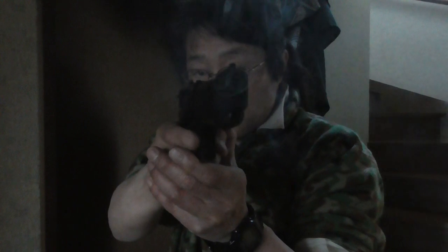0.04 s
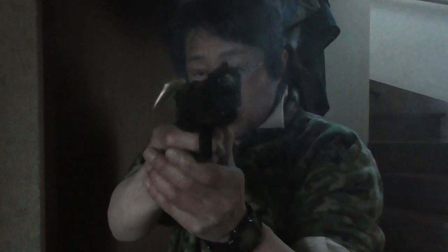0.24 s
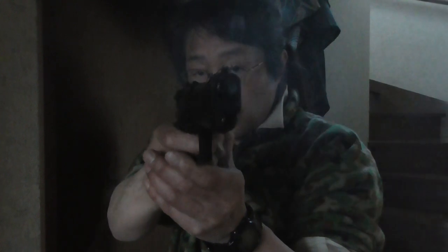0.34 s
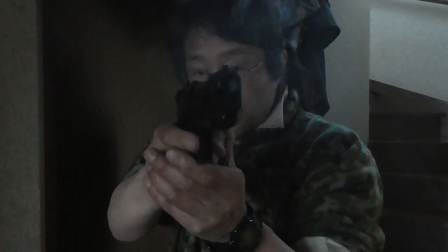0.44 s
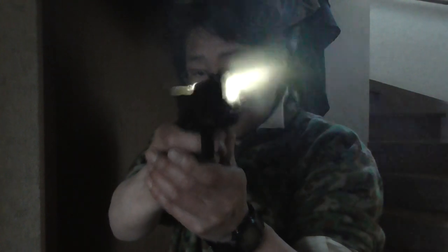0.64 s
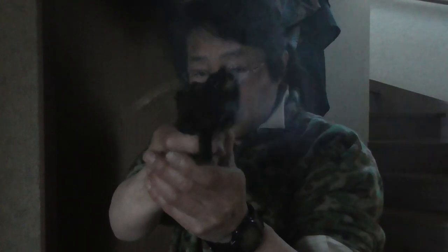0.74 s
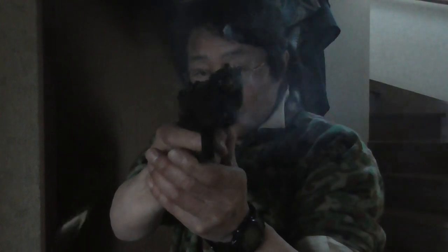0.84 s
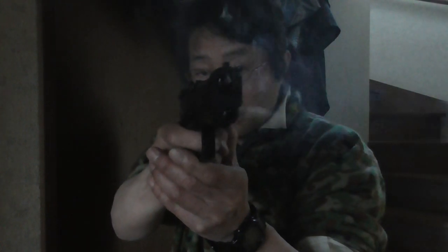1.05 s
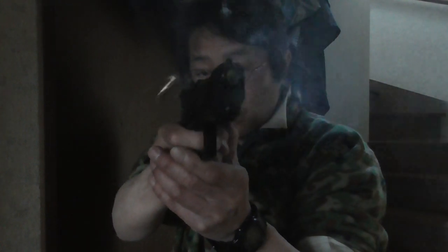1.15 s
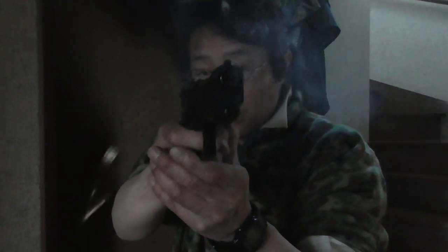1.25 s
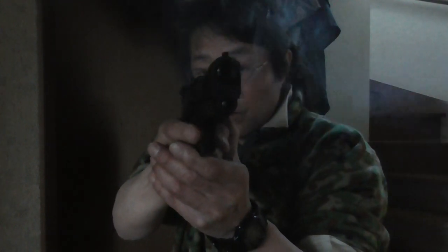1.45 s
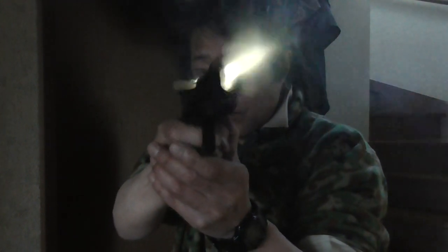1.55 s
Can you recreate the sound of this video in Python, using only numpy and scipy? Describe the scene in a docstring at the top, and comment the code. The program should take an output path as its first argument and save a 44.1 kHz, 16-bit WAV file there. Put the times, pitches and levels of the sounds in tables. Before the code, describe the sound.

A cap pistol cracks three times indoors, with spent casings knocking and clicking between shots.

```python
"""Cap pistol in a small room

A toy pistol fires towards the microphone. Each shot is a hammer snap, the crack of the cap,
a pressure pulse and a puff of gas; then the slide slams shut. Between shots, ejected casings
knock on the wooden floor, click and clink. The hard-walled room rings over a faint hiss and hum."""
import sys
import numpy as np
from scipy import signal
from scipy.fft import rfft, irfft, next_fast_len
from scipy.io import wavfile

SR = 44100
rng = np.random.default_rng(int(sys.argv[2]) if len(sys.argv) > 2 else 0)


def master_out(mix):
    """Clip the mix to full scale and print it as 16-bit PCM to the path in sys.argv[1]."""
    frames = np.transpose(np.atleast_2d(mix))
    ceiling = np.clip(frames, -1, 1)
    pcm = np.round(ceiling * 32767).astype(np.int16)
    wavfile.write(sys.argv[1], SR, pcm)


N = 70560
LEAD = SR // 4  # pre-roll for cues that start before zero
AGE = np.arange(SR) / SR  # seconds into a one-second sound

# Shots, the first heard only as a tail: start_s, level_db, pulse_db, puff_delay_s, puff_db
SHOTS = [(-.215, -0.5, -6, .008, -16), (0.2471, -1, -5, 0.0027, -11), (0.7301, -1.5, -13.5, .008, -13.5),
         (1.1565, -1, -10, 0.00833, -6)]
# Slapback off the nearest walls: delay_s, level_db
SLAPBACKS = [(.0065, -17), (0.0138, -13.5), (0.028, -20.5)]
# EQ for the dry crack, its reverb and the gas puff: freq_hz, gain_db
CRACK_EQ = [(100, -0.5), (700, 6.5), (1500, 1), (2700, -7), (4300, 4), (6000, 0.5), (8000, 6.5), (11000, 2),
            (15500, -7.5)]
SHOT_REVERB_EQ = [(50, -26), (125, -22), (250, -8.5), (480, 0), (780, -0.5), (1050, -5), (1400, -7),
                  (1800, -18.5), (2150, -11.5), (2700, -18.5), (3250, -12), (3900, -12), (4300, -9.5),
                  (4800, -11), (6400, -12), (8000, -7.5), (10500, -8.5), (13000, -15), (15500, -25.5)]
PUFF_EQ = [(25, -25), (60, 6.5), (130, 11), (260, 12.5), (500, 9.5), (1000, 5), (3000, -23)]

# Slide slams and rebounds, and trigger ticks: start_s, level_db
SLIDE_HITS = [(0.3091, -7), (0.317, -16), (0.7932, -7.5), (0.803, -19), (1.2224, -7)]
TRIGGER_TICKS = [(.2199, -1.5), (0.24, 6), (1.1086, -5), (1.148, 4.5)]
# EQ for the bright slide and the faint trigger: freq_hz, gain_db
SLIDE_EQ = [(60, -69), (250, -47), (1000, -37), (3000, -61), (4900, -16.5), (6300, -34), (8200, -17),
            (11000, -31), (15000, -43)]
TRIGGER_EQ = [(60, -74), (250, -46), (2000, -52.5), (5000, -50.5), (9000, -54.5), (15000, -60)]

# Casings landing on wood, and one ringing bounce: start_s, level_db
KNOCKS = [(-.012, -2.5), (.006, -8.5), (.376, -7), (.388, -1.5), (.653, -0.5), (.6605, -3.5), (0.8443, -10),
          (.851, 3), (1.126, -13.5), (1.3269, -1), (1.553, -13), (1.563, -5.5)]
CLINKS = [(0.6605, -27.5)]
# Casings striking hard things: start_s, level_db, reverb_send_db
CLICKS = [(-.01, -9, 3.5), (0.4409, -10, -2), (0.6604, -4.5, 6), (0.9235, -11.5, 3), (1.0312, -19.5, 5),
          (1.3262, 4, -1.5), (1.5612, -20, 7.5)]
# EQ for the woody knocks and the sharp clicks: freq_hz, gain_db
KNOCK_EQ = [(25, -63), (60, -50), (90, -33), (140, -22), (250, -28.5), (500, -19), (1000, -18.5),
            (1700, -23.5), (2200, -23), (3000, -28.5), (4500, -24.5), (7000, -40), (10500, -39),
            (15000, -47.5)]
CLICK_EQ = [(60, -93), (250, -62), (1500, -31.5), (3500, -27.5), (4700, -24), (5150, -24.5), (5700, -30.5),
            (7000, -23), (8200, -26.5), (9400, -22.5), (11500, -31), (13500, -37), (15500, -54)]
# Resonances of a casing, the floorboards and the room: pitch_hz, level_db, t60_s
CASING_MODES = [(3765, -2.5, 0.37), (3740, 5, 0.18), (4050, -8, .11), (8430, -13.5, 0.17), (9800, -11, .14)]
BOARD_MODES = [(107, -63, 0.11), (137, -50, 0.064), (159, -36, 0.21), (199, -38, 0.16)]
ROOM_MODES = [(254.7, -24.5, 0.45), (292.3, -24, 0.76), (317.3, -12.5, 0.15), (357.8, -24, 0.64),
              (441, -21, 0.32), (508.3, -24, 0.44), (579.6, -20, 0.28), (650.6, -28, 0.73),
              (733.5, -27, 0.54), (748.2, -20, .5), (813, -29, 0.41), (844.6, -18, 0.31), (945, -35, 1),
              (1068, -38.5, 1), (1168, -23, 0.27), (1278, -29, 0.88), (1418, -32, 0.82)]

# The room's diffuse tail: freq_hz, level_db, t60_s, stereo_correlation
ROOM_TAIL = [(60, -2, 0.48, 0.52), (140, -2.5, 0.73, .95), (304, -3, 0.63, 0.83), (600, -3, 0.63, 0.72),
             (830, -2.5, 0.7, 0.66), (1000, -1.5, 0.74, 0.52), (1970, 0.5, 0.54, 0.57),
             (4200, 0.5, 0.43, 0.64), (7600, -3, 0.45, 0.17), (11000, -3.5, 0.33, -0.38),
             (15000, 1, 0.26, 0.27)]
# EQ for the background hiss: freq_hz, gain_db
HISS_EQ = [(25, -66), (70, -65.5), (200, -55), (800, -72), (2000, -54), (8000, -66), (15000, -82)]


def shots(room, hammer_db=-10.5, cap_db=-6.5, cap_delay_s=.0009):
    """The hammer snaps, the cap cracks, the nearest walls slap back and the room rings."""
    cues = [shot[:2] for shot in SHOTS]
    hammer = placed((s, burst(db + hammer_db, t60=0.0088, correlation=0.92)) for s, db in cues)
    cap = placed((s + cap_delay_s, burst(db + cap_db, t60=0.01, correlation=.88)) for s, db in cues)
    walls = placed((s + delay, burst(db + wall_db, t60=0.042, correlation=0.71))
                   for s, db in cues for delay, wall_db in SLAPBACKS)
    reverb = placed((s + cap_delay_s, from_db(db) * room) for s, db in cues)
    return eq(hammer + cap + walls, CRACK_EQ) + eq(reverb, SHOT_REVERB_EQ)


def muzzle_gas(pulse_delay_s=0.00508, pulse_width_s=0.00093, puff_rise_s=0.0049):
    """A pressure pulse, then a puff that buffets the two microphone ports against each other."""
    from_peak = (AGE - pulse_delay_s) / pulse_width_s
    pulse = panned((1 - from_peak ** 2) * np.exp(-from_peak ** 2 / 2), pan_db=-8.5)
    pulses = placed((s, from_db(db) * pulse) for s, _, db, _, _ in SHOTS)
    swell = AGE / puff_rise_s * np.exp(1 - AGE / puff_rise_s)
    puffs = placed((s + delay, from_db(db) * swell * stereo_noise(correlation=-1))
                   for s, _, _, delay, db in SHOTS)
    return pulses + panned(eq(puffs, PUFF_EQ), pan_db=-3)


def slide(room):
    """The slide slams shut after a shot and may rebound."""
    slams = placed((s, from_db(db) * (burst(db=16, t60=0.029, correlation=0.91) + from_db(-20) * room))
                   for s, db in SLIDE_HITS)
    return eq(slams, SLIDE_EQ)


def trigger(room):
    """Trigger and hammer tick as they are drawn back."""
    ticks = placed((s, from_db(db) * (burst(db=10, t60=0.027, correlation=.6) + from_db(1.5) * room))
                   for s, db in TRIGGER_TICKS)
    return eq(ticks, TRIGGER_EQ)


def casing_knocks(room, board_rise_s=0.0038):
    """Spent casings hit the floor and the boards thump underneath."""
    knocks = placed((s, from_db(db) * (burst(db=3, t60=0.1, correlation=0.67) + from_db(-3) * room))
                    for s, db in KNOCKS)
    attack = 1 - np.exp(-AGE / board_rise_s)
    thumps = placed((s, from_db(db) * ringing(BOARD_MODES) * attack) for s, db in KNOCKS)
    return eq(knocks, KNOCK_EQ) + thumps


def casing_clicks(room):
    """Casings glance off hard things with short, bright clicks."""
    clicks = placed(
        (s, from_db(db) * (burst(db=11.5, t60=0.012, correlation=0.22) + from_db(send_db) * room))
        for s, db, send_db in CLICKS)
    return eq(clicks, CLICK_EQ)


def casing_clink(room, send_db=-25.5):
    """A casing bounces and rings; its attack feeds the reverb."""
    ring = ringing(CASING_MODES)
    reverb = from_db(send_db) * signal.fftconvolve([ring * decay(t60=0.044)], room)[:, :SR]
    return placed((s, from_db(db) * (ring + reverb)) for s, db in CLINKS)


def room_response(build_s=0.001):
    """Dense reflections die band by band over the room's standing waves."""
    hz = np.fft.rfftfreq(SR, 1 / SR)
    mid, side = rfft(rng.standard_normal((2, SR)))
    field = from_db(at_hz(ROOM_TAIL, hz)) * widened(mid, side, at_hz(ROOM_TAIL, hz, column=3))
    edges_hz = np.geomspace(20, SR / 2, 25)
    tail = 0
    for low, high in zip(edges_hz, edges_hz[1:]):
        band = irfft(field * ((hz >= low) & (hz < high)))
        tail += band * decay(at_hz(ROOM_TAIL, np.sqrt(low * high), column=2))
    return (tail + ringing(ROOM_MODES)) * (1 - np.exp(-AGE / build_s))


def room_tone(hum_hz=81.5, hum_db=-74.5):
    """A quiet, centred bed of hiss and low hum."""
    hiss = eq(stereo_noise(correlation=1, size=LEAD + N), HISS_EQ)
    hum = from_db(hum_db) * np.sin(2 * np.pi * hum_hz * np.arange(LEAD + N) / SR)
    return hiss + hum


def burst(db, t60, correlation):
    """The dry noise transient of a hit."""
    return from_db(db) * decay(t60) * stereo_noise(correlation)


def ringing(modes):
    """Decaying sines at random phases."""
    return sum(from_db(db) * decay(t60) * np.sin(2 * np.pi * (hz * AGE + rng.random()))
               for hz, db, t60 in modes)


def decay(t60):
    """An envelope that falls 60 dB in t60 seconds."""
    return np.exp(-np.log(1000) * AGE / t60)


def stereo_noise(correlation, size=SR):
    """White noise with a set stereo width."""
    mid, side = rng.standard_normal((2, size))
    return widened(mid, side, correlation)


def widened(mid, side, correlation):
    """Mid/side to stereo: correlation 1 is mono, -1 is out of phase."""
    return np.sqrt((1 + correlation) / 2) * mid + np.sqrt((1 - correlation) / 2) * np.array([side, -side])


def panned(x, pan_db):
    """Positive pan_db leans left, negative right."""
    return x * from_db(np.array([[.5], [-.5]]) * pan_db)


def eq(x, curve):
    """Minimum-phase EQ, so nothing rings ahead of a transient."""
    size = 2 * next_fast_len(x.shape[-1])
    gain = from_db(at_hz(curve, np.fft.rfftfreq(size, 1 / SR)))
    cepstrum = irfft(np.log(gain))
    cepstrum[1:size // 2] *= 2
    cepstrum[size // 2 + 1:] = 0
    return irfft(rfft(x, size) * np.exp(rfft(cepstrum)))[..., :x.shape[-1]]


def at_hz(table, hz, column=1):
    """Read a table on a log-frequency axis."""
    table = np.array(table)
    return np.interp(np.log(hz + 1), np.log(table[:, 0]), table[:, column])


def from_db(db):
    """Decibels to gain."""
    return 10 ** (np.asarray(db) / 20)


def placed(cues):
    """Lay (start_s, sound) cues on a stereo track with pre-roll."""
    track = np.zeros((2, LEAD + N + 2 * SR))
    for start_s, sound in cues:
        start = max(LEAD + int(start_s * SR), 0)
        track[:, start:start + SR] += sound
    return track[:, :LEAD + N]


def scene():
    """Pistol and casings share one reverb, over the room tone."""
    room = room_response()
    background = room_tone()
    pistol = shots(room) + muzzle_gas() + slide(room) + trigger(room)
    casings = casing_knocks(room) + casing_clicks(room) + casing_clink(room)
    return (pistol + casings + background)[:, LEAD:]


def record(dry):
    """Soft-clip the loudest peaks and cut the extreme top."""
    rounded = 1.2 * np.tanh(dry / 1.2)
    high_cut = signal.cheby2(16, 60, 16500, fs=SR, output="sos")
    return signal.sosfilt(high_cut, rounded)


dry = scene()
out = record(dry)
master_out(out)
```